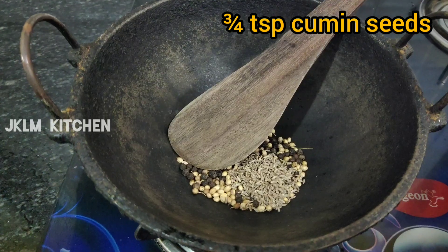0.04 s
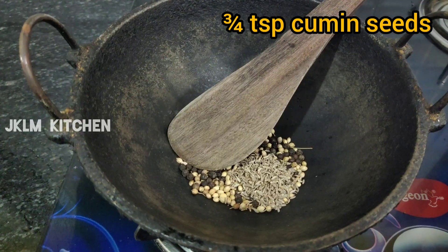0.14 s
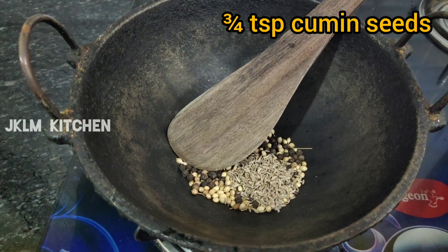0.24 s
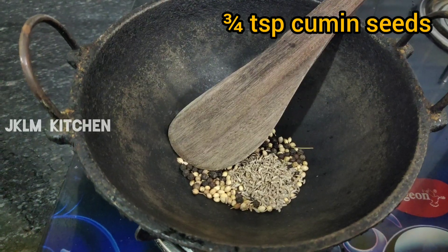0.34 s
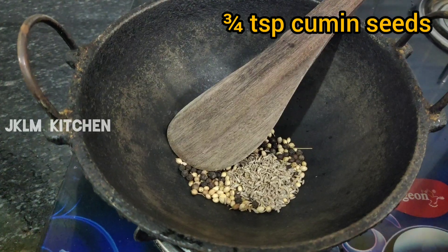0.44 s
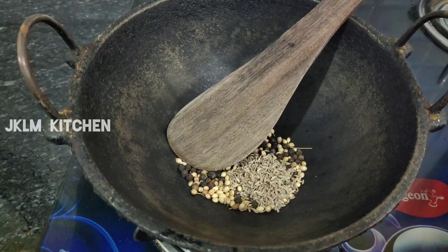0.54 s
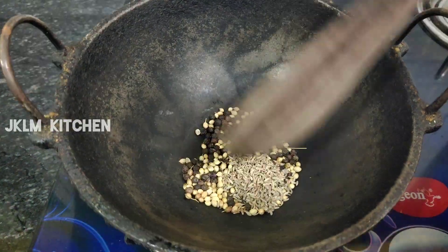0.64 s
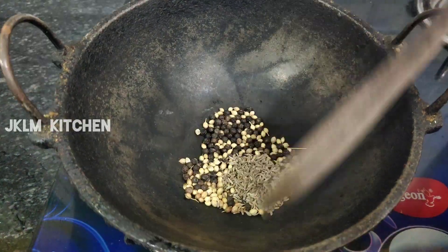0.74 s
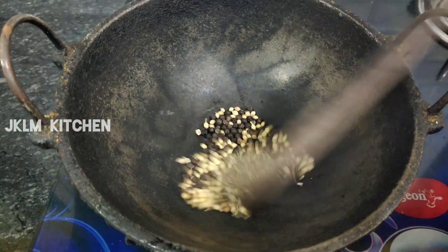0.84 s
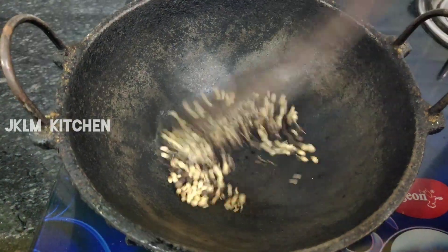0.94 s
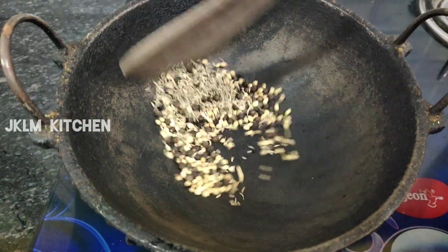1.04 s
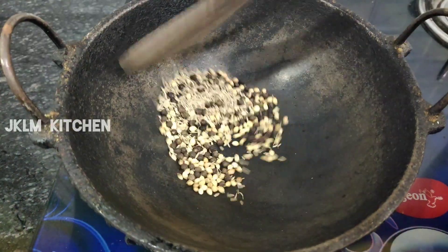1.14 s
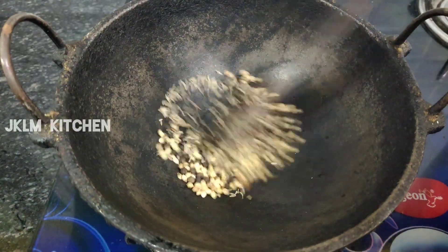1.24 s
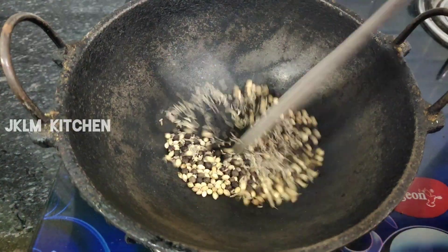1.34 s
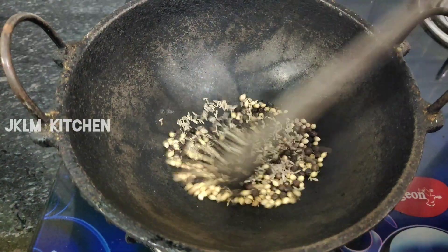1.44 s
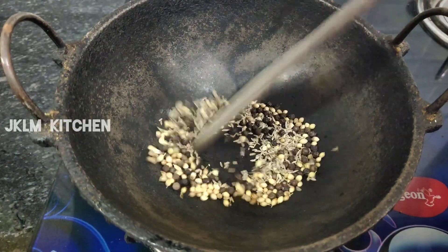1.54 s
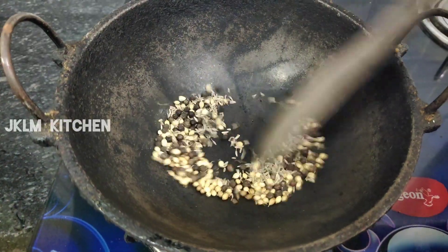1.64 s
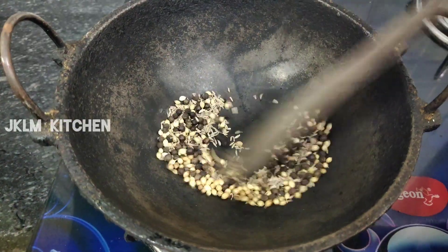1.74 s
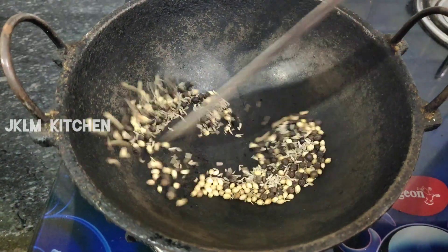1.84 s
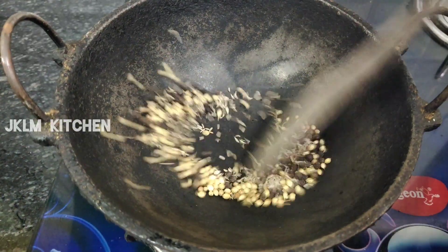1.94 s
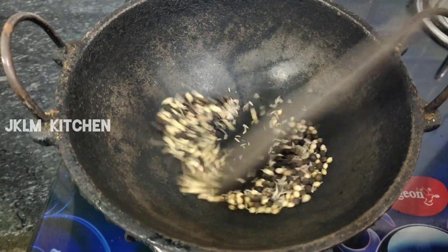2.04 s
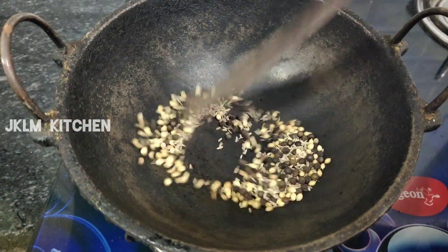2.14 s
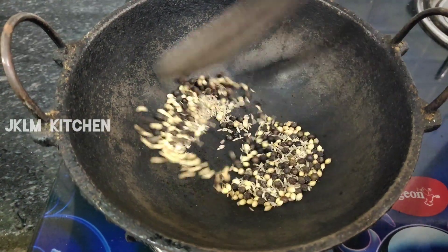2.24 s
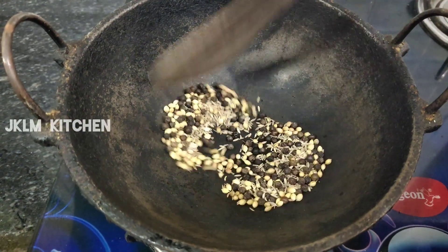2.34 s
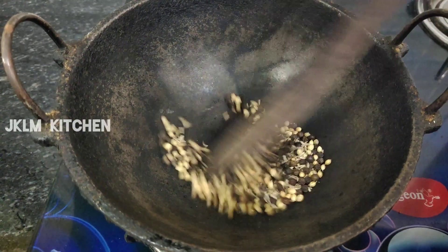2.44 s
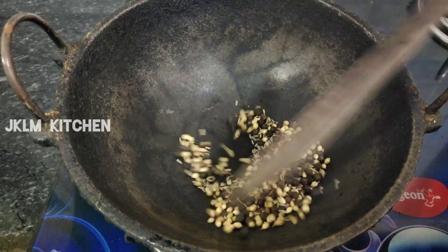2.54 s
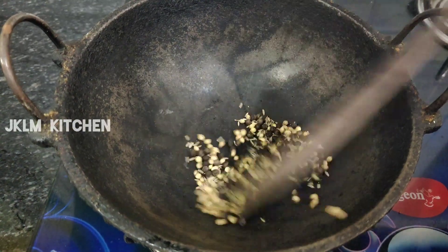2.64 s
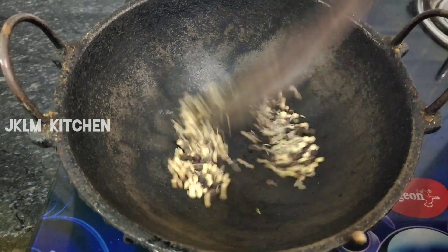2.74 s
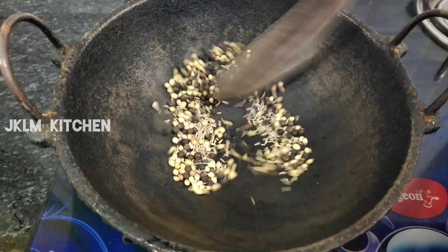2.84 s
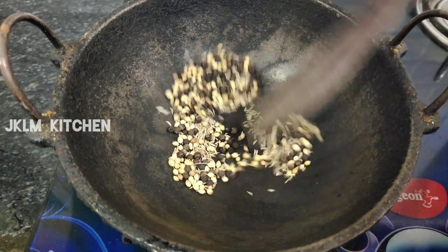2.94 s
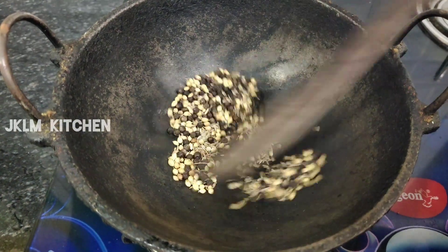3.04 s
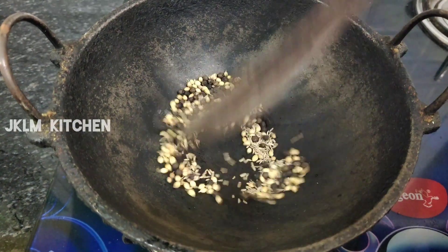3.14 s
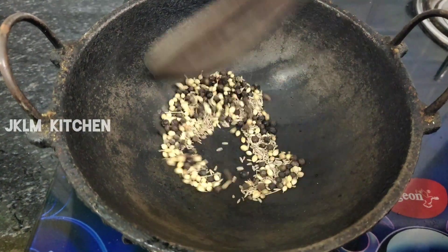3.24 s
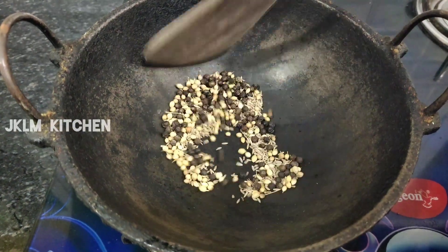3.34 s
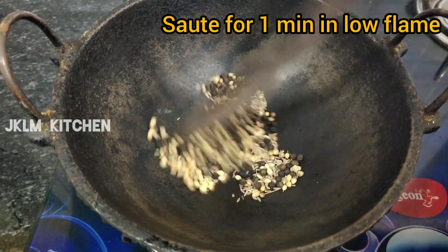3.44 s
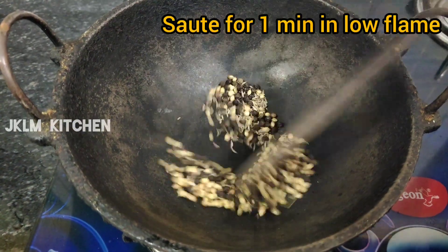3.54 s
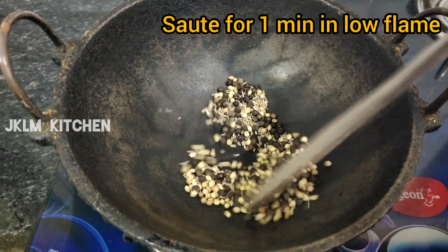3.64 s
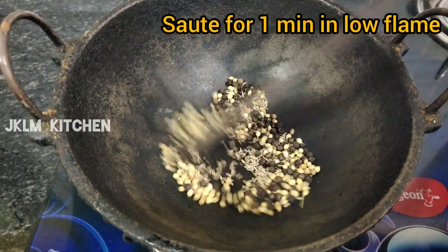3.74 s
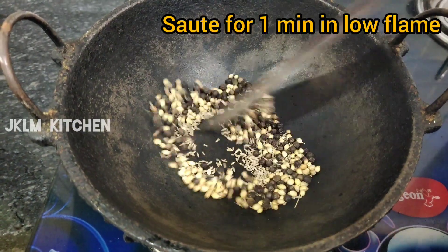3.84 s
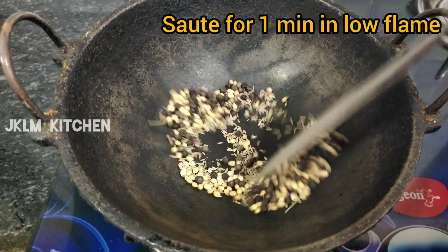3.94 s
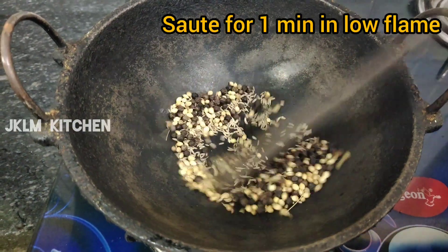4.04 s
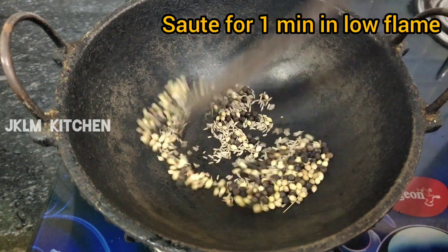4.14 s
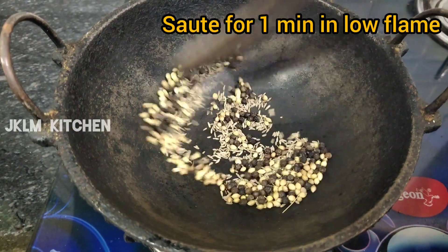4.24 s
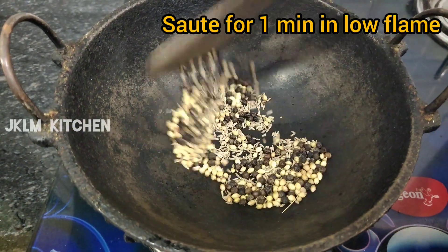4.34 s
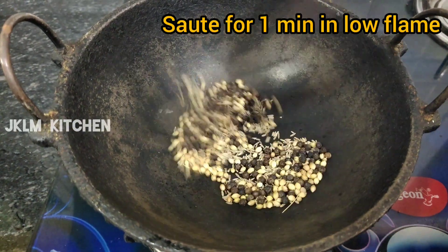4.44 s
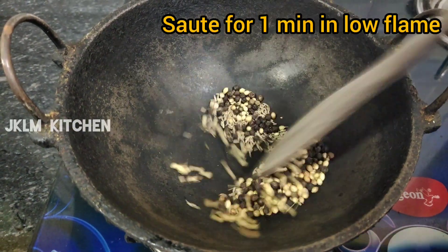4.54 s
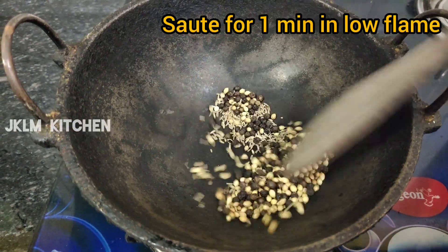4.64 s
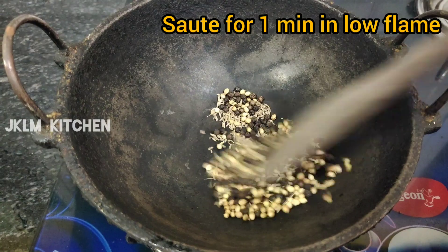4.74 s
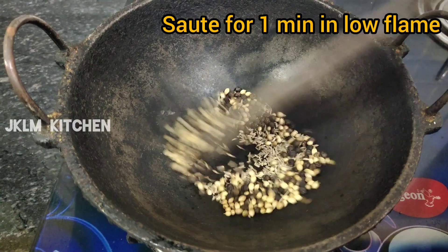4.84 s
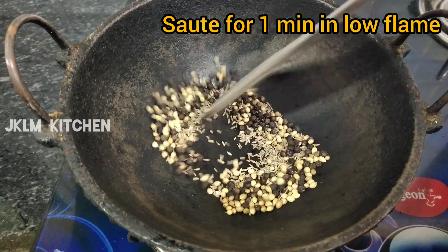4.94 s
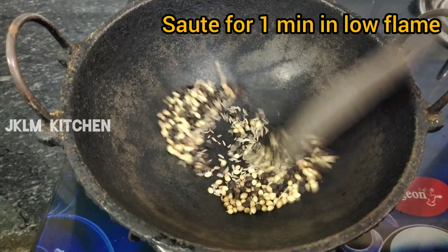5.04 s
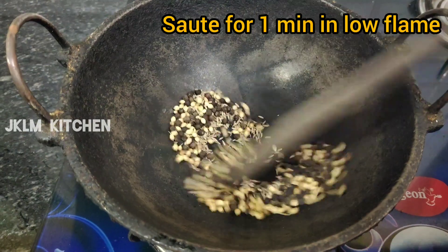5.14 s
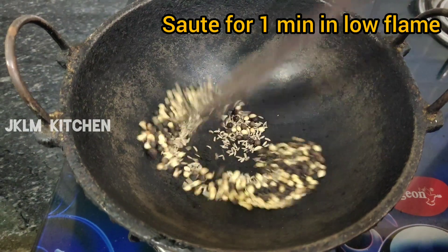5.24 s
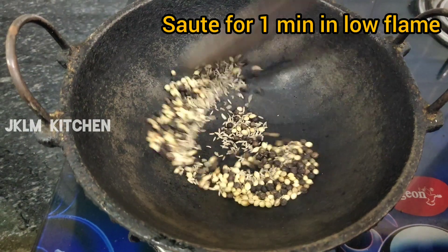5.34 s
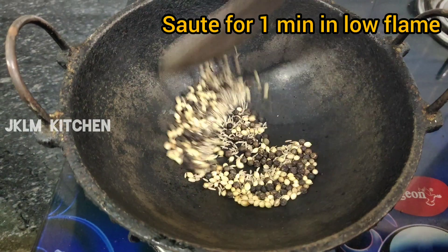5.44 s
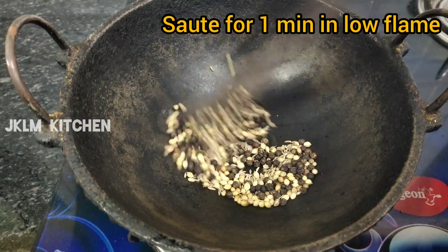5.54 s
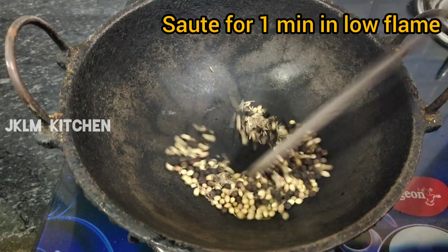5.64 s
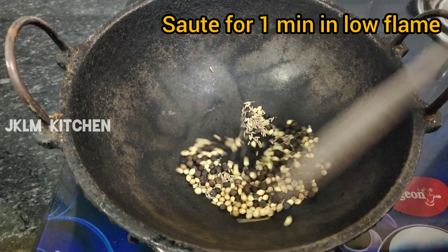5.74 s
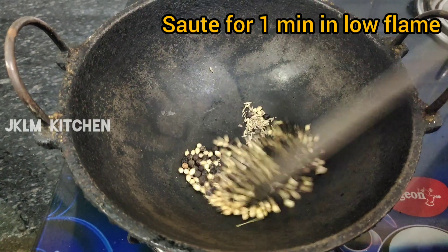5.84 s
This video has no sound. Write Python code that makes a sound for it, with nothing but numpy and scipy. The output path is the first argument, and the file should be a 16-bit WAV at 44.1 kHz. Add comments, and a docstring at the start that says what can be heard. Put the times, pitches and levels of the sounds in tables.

```python
"""Stirring seeds in an iron pan

A wooden spatula stirs lentils, peppercorns and cumin in an iron pan, close by and a little to the left.
Dense random impacts excite the resonances of bowl and iron; larger single impacts are flung seeds and blade knocks.
Stick-slip of the dragging blade shakes the pan's low modes, and single bumps shake the bowl.
Shaped noise makes a quiet kitchen with a burner whistle, heard alone first; a brief silence precedes the stirring."""
import sys
import numpy as np
from scipy import signal
from scipy.fft import rfft, irfft
from scipy.io import wavfile
from scipy.ndimage import uniform_filter1d

SR = 44100
rng = np.random.default_rng(int(sys.argv[2]) if len(sys.argv) > 2 else 0)


def file_out(sig):
    """Save sig as 16-bit WAV at sys.argv[1]."""
    # one column per channel
    cols = np.atleast_2d(sig).T
    # limit, then scale
    lim = np.clip(cols, -1, 1)
    pcm = np.round(lim * 32767).astype(np.int16)
    wavfile.write(sys.argv[1], SR, pcm)


N = 259551
MUTE_START_S, MUTE_END_S = 0.509, 0.868

# tosses of the heap: fullest_s, swell_s and settle_s (nominal time per 20 dB, steeper further down), cumin_db,
# lentil_db, pepper_db, rasp_db (each relative to cumin), left_minus_right_db
TOSSES = [(0.937, 0.062, 0.41, -43, -3.5, -6.5, -7, 6), (1.27, 0.035, 0.36, -42.5, -2, -5.5, -17.5, 7.5),
          (1.501, 0.031, 0.47, -46.5, -1.5, -7, -7.5, 8), (1.607, 0.043, 0.043, -43, -11, -12, -14, 9.5),
          (1.721, 0.16, 0.25, -44, -0.5, -1, -8.5, 7), (1.87, 0.055, 0.097, -39.5, -2.5, -8, -24, 11),
          (1.966, 0.22, 0.31, -44.5, -1.5, -5, -2.5, 8), (2.062, 0.074, 0.09, -40, -4, -2, -14, 6.5),
          (2.182, 0.22, 0.15, -43, -2.5, -8.5, -9.5, 9), (2.254, 0.17, 0.39, -47.5, -3.5, -7.5, -22, 5.5),
          (2.4, 0.0063, 0.18, -46, -3, 1, 6, 8), (2.487, 0.0055, 0.21, -35, -1, -4.5, -31, 6.5),
          (2.725, 0.023, 0.28, -43.5, 3, 5, -1.5, -2), (2.87, 0.86, 0.66, -47, -9, -17, -22, 8.5),
          (2.951, 0.026, 0.15, -50, -7, -18, -15, 11), (3.036, 0.19, 0.096, -45.5, 0.5, -6.5, -8.5, 8.5),
          (3.18, 0.076, 0.15, -44.5, 1, -13, -14, 13.5), (3.235, 0.12, 0.14, -44.5, -1, -2, -2.5, 5),
          (3.366, 0.0073, 0.069, -54, -29, -26, -32.0, 7), (3.508, 0.11, 0.19, -39, -1.5, -1, -8, 9),
          (3.701, 0.2, 0.51, -46.5, -6, -23, -26, 9), (3.765, 0.028, 0.34, -46.5, -2.5, -20, -20, 8.5),
          (3.993, 0.18, 0.4, -46, -1, -1.5, -31.5, 9), (4.232, 0.16, 0.14, -46, 1, -10, -13.5, 9.5),
          (4.283, 0.018, 0.21, -44, -13, -11, -24, 7.5), (4.412, 0.031, 0.78, -51, -27, -32, -17, 9),
          (4.534, 0.049, 0.23, -38, -1, -5.5, -14, 8), (4.773, 0.0076, 0.93, -54.5, 0.5, -1.5, -25, 7),
          (4.951, 0.27, 0.049, -48, -7, -4.5, -9.5, 10), (5.118, 0.2, 0.12, -43, -1.5, 0.5, -10, 9.5),
          (5.192, 0.13, 0.52, -49, -2.5, -6, -9, 9), (5.347, 0.14, 0.35, -47, -13, -10, -5, 7.5),
          (5.548, 0.022, 0.28, -50.5, -20, 6.5, 2, 9), (5.609, 0.015, 0.23, -38.5, -1, -6.5, -30, 9)]
# broad resonances of bowl and microphone, lower and upper set: centre_hz, width_hz, level_db
HEAVY = [(1460, 200, -8), (2150, 260, -2), (2420, 380, -6), (2650, 350, -5), (3250, 700, -7),
         (3700, 700, -9), (4050, 450, -8), (4800, 600, -6.5)]
FINE = [(5660, 540, -3), (6320, 510, -4.5), (7560, 600, 0.5), (8200, 960, -1.5), (9040, 460, 1.5),
        (10030, 960, -7), (10900, 840, -11), (12200, 3700, -19.5), (14330, 1700, -8)]
# woody resonances of the blade: centre_hz, width_hz, level_db
WOOD = [(805, 210, 3), (1094, 340, 0.5), (1475, 380, 1.5)]
# modes of the iron: mode_hz, level_db, t60_s
IRON = [(684, -13, .15), (1404, -10, .07), (1890, -5, .05), (2112, -1, .09), (2190, -4, .08),
        (2240, 0, .15), (2418, -2, .12), (2500, -5, .09), (2590, -1, .16), (2680, -5, .09), (2786, -8, .1),
        (3950, -8, .06)]
# high, quickly damped modes of the iron that small seeds ring: mode_hz, level_db, t60_s
GLINT = [(3283, -23, 0.13), (3492, -11, 0.054), (3660, -1.5, 0.042), (4760, -15, 0.021), (5030, -15, 0.026),
         (5584, -1, 0.035), (7130, -12, 0.03), (7470, -4.5, 0.036), (7800, -1, 0.035), (8440, -2, 0.035),
         (9150, 2, 0.041), (9400, -4, 0.037), (9630, -7, 0.04), (10050, -7, 0.035)]
# low modes of the pan wall, then of the bowl: centre_hz, width_hz, level_db
WALL = [(495, 35, -5), (582, 35, -1), (640, 35, -2), (684, 25, -1), (760, 90, -10)]
BOWL = [(277.5, 92, -5.5), (320.4, 46, -0.5), (425, 24, -11)]
# opening background: time_s, kitchen_db, wall_hum_db
OPENING = [(0.0, -65, -75), (0.024, -65, -66), (0.1, -64, -78), (0.168, -65.5, -65), (0.338, -65.5, -56.5),
           (0.37, -62.5, -65), (0.464, -60, -64.5), (0.496, -58, -68), (0.502, -84, -90)]


def seeds():
    """Granular impact noise: cumin hisses high, lentils rattle lower, peppercorns lowest; all stir iron modes."""
    *_, lentil_db, pepper_db, _, _ = np.transpose(TOSSES)[..., None]
    glint_db, clump_db, clumps_per_s = -10, 2.0, 45
    cumin = rattle(FINE, GLINT[5:], glint_db, count=40000)
    lentils = rattle(HEAVY[4:], GLINT[:5], glint_db, count=24000)
    pepper = rattle(HEAVY[:4], IRON, -5, count=16000)
    # the heaviest come to rest sooner; low sounds diffract, so they differ less between left and right
    heap = tossed(0, speed=0.94, sideways=0.85) * cumin
    heap = heap + tossed(lentil_db, speed=1, sideways=0.6) * lentils
    heap = heap + tossed(pepper_db, speed=1.58, sideways=0.083) * pepper
    clumps = undb(clump_db * walk(clumps_per_s))
    return light(clumps * heap)


def ticks():
    """Repeated impact: a flung seed lands and chatters for an instant, exciting the iron at each contact."""
    # single seeds: time_s, peak_db, bright_db (relative), left_minus_right_db
    landings = [(0.961, -34, 9, 11.5), (1.28, -34.5, 12, 20.5), (1.3066, -40.5, 3, 18),
                (1.312, -40.5, 11, 14), (1.4974, -51, 13, 7), (1.5977, -54, 8, 6), (1.671, -42, 5, 11),
                (1.681, -36, 10, 8), (1.7083, -37, 0, 15), (1.849, -48, 13, 6), (1.9295, -44, 16, 6),
                (1.9486, -45, 14.5, 5), (1.967, -40, 14, 8), (2.029, -46, 12, 8), (2.086, -42, 15, 11),
                (2.104, -47, 13, 6), (2.137, -43, 11, 8), (2.161, -45, 12, 8), (2.1772, -42.5, 15, 13),
                (2.338, -58, 21, 11), (2.4771, -30.5, 16, 16.5), (2.4863, -36, 11, 9), (2.494, -35, 14, 16),
                (2.501, -39, 15, 11), (2.507, -41, 12, 10), (2.519, -43, 1, 10), (2.5194, -49, 13, 6),
                (2.544, -40, 7.5, 5), (2.9475, -36.5, 10, 4), (3.0197, -40, 9, 7), (3.142, -53.5, 20.5, 10),
                (3.181, -54, 9, 8), (3.2309, -45, 17, 14.5), (3.366, -59.5, 24, 7), (3.48, -42, 19, 14),
                (3.482, -38.5, 13.5, 16), (3.496, -43, 8, 9), (3.532, -40, 13, 9), (3.56, -44, 16, 8),
                (3.691, -48, 13, 10), (3.753, -52, 20, 15), (3.771, -48, 10, 5), (3.914, -48, 12, 7),
                (3.9383, -45, 7, 11), (3.979, -38, 4, 11), (3.984, -49, 2, 5), (4.002, -43, 16.5, 9),
                (4.026, -36.5, 7.5, 12), (4.045, -38, 2, 6), (4.08, -50, -3, 5), (4.2002, -49, 16, 14),
                (4.217, -43, 2, 5), (4.233, -43, 13.5, 16), (4.242, -29.5, -18, 4),
                (4.2752, -42.5, 17.5, 6), (4.307, -47, 5, 10), (4.406, -64.5, 29, 16), (4.474, -62, 21, 10),
                (4.5117, -48.5, 26.5, 16), (4.5205, -43, 18.5, 17), (4.554, -41, -10, 15),
                (4.7752, -43, 12.5, 5.5), (4.811, -48, -11, -1), (5.026, -47, 9, 3), (5.039, -34.5, 0, 8),
                (5.107, -48, 14, 8), (5.118, -36.5, 5.5, 12), (5.6113, -30, 7, 17), (5.625, -51, 8, 7),
                (5.671, -40.5, 1.5, 21), (5.7553, -52, 15, 9)]
    s, db, bright_db, pan_db = np.transpose(landings)
    gain = panned(db, pan_db)
    low, bright = (strikes(s, size, lag_s=.00008, count=6, spread_s=.001, chatter=.55)
                   for size in (gain, gain * undb(bright_db)))
    low_part = body(low, HEAVY) / peak_of(HEAVY)
    glint = undb(-41) * ring(bright, GLINT)
    bright_part = (body(bright, FINE) + glint) / peak_of(FINE)
    return light(soft(low_part + bright_part))


def knocks():
    """Impact excitation: wood clacks on iron, then the blade skids on and keeps the iron modes ringing."""
    # blade knocks: time_s, peak_db, woody_db, bright_db, ring_db (each relative), left_minus_right_db
    blows = [(0.887, -20.5, -1, -8, -30.5, 7), (1.926, -39, 12.5, -3, -40, 0),
             (2.402, -24.5, -2, 10, -25, 6), (2.725, -19.5, -8, 6, -26.5, 8.5),
             (3.192, -43, 12.5, 1, -34, 4), (3.442, -27, 1, 1, -26.5, 5.5), (3.541, -40, 9.5, -10, -36, 2),
             (4.485, -59, 16, -8, -38, 3), (5.0056, -44.5, 11.5, -7, -11.5, 2),
             (5.332, -45, 7, 19, -34, 10), (5.547, -34.5, 8, 2, -18.5, 5)]
    # resonances of body, then bright edge: centre_hz, width_hz, level_db
    clack_peaks = [(2150, 190, 0), (2430, 200, -4), (2620, 220, -5), (2950, 300, -12)]
    edge_peaks = [(3250, 450, -6), (3680, 300, -2), (3980, 200, 0), (5650, 220, -3), (7750, 300, -3),
                  (9000, 700, -5)]
    s, db, low_db, bright_db, ring_db, pan_db = np.transpose(blows)
    gain = panned(db, pan_db)
    clack = 0
    for part_db, peaks in ((0, clack_peaks), (low_db, WOOD), (bright_db, edge_peaks)):
        contacts = strikes(s, gain * undb(part_db), lag_s=.00004, count=3, spread_s=0.00143, chatter=0.16)
        clack = clack + body(contacts, peaks) / peak_of(peaks)
    skid = strikes(s, gain * undb(ring_db), lag_s=.0001, count=200, spread_s=.065, chatter=.22)
    return soft(clack) + ring(skid, IRON)


def drag():
    """Stick-slip friction: the blade shakes the low modes; the deeper they are, the more alike at both ports."""
    # low modes under the blade: time_s, wall_ring_db, bowl_thrum_db, stove_rumble_db
    low_levels = [(0.89, -60.5, -65, -61), (0.93, -50.5, -58, -57.5), (1.11, -50.5, -60, -58.5),
                  (1.89, -55, -57.5, -54.5), (2.0, -51.5, -46, -49.5), (2.36, -55.5, -66.5, -61),
                  (2.42, -49.5, -56, -61), (2.53, -55, -58, -49), (2.7, -72, -65, -63),
                  (2.73, -81, -52, -53), (2.81, -63, -61.5, -81), (2.98, -59.5, -48.5, -66),
                  (3.1, -82, -62, -83), (3.2, -56, -58.5, -66), (3.27, -60, -60, -52),
                  (3.41, -69, -75, -82), (3.45, -53, -52, -75), (3.5, -59, -55.5, -53),
                  (3.55, -48.5, -55, -53), (3.64, -63, -58.5, -57.5), (3.89, -68.5, -67.5, -73),
                  (4.59, -63, -68, -56), (4.95, -60.5, -68, -73), (5.02, -52.5, -62, -59),
                  (5.1, -58.5, -76, -76), (5.17, -52, -71, -63), (5.3, -65, -74, -71),
                  (5.44, -63, -53, -52.5), (5.49, -69, -58.5, -54), (5.59, -45, -48.5, -66),
                  (5.65, -69, -54, -73), (5.88, -62, -78, -69)]
    # modes of the pan on its stove: centre_hz, width_hz, level_db
    stove_peaks = [(102, 14, -7), (125, 11, 0), (175, 28, -6)]
    wall_db, bowl_db, stove_db = columns(low_levels)
    wall = panned(wall_db, -2.5) * slips(WALL, apart=.6)
    bowl = panned(bowl_db, 0) * slips(BOWL, apart=.33)
    stove = panned(stove_db, 0) * slips(stove_peaks, apart=.19)
    return wall + bowl + stove


def rasp():
    """Stick-slip friction again, here exciting the woody resonances of the blade with every toss."""
    *_, rasp_db, _ = np.transpose(TOSSES)[..., None]
    return tossed(rasp_db, speed=0.99, sideways=0) * slips(WOOD, apart=1.0)


def bumps():
    """Impulse response of the bowl: dull bumps of the pan on its stand, alike at both ports."""
    # single bumps: time_s, peak_db
    thuds = [(1.938, -41), (1.9988, -32), (2.897, -44), (2.961, -47), (5.347, -51), (5.422, -41.5),
             (5.594, -56), (5.689, -55)]
    s, db = np.transpose(thuds)
    return body(strikes(s, undb([db, db]), lag_s=0), BOWL) / peak_of(BOWL)


def burner(first):
    """Noise-driven resonance: a thin whistle of the burner, with a treble hiss at first."""
    # level before stirring: time_s, whistle_db, treble_db
    flame_levels = [(0.0, -63, -90), (0.03, -68, -96), (0.12, -75, -89), (0.2, -103, -83), (0.25, -69, -83),
                    (0.28, -79, -88), (0.34, -68, -76), (0.4, -63, -79), (0.49, -62, -79),
                    (0.502, -95, -86)]
    # whistle resonances: centre_hz, width_hz, level_db
    whine_peaks = [(3320, 190, -2), (3400, 70, 2), (3670, 140, -9)]
    whine_db, treble_db = columns(flame_levels)
    whine = unit(body(rng.standard_normal((2, N)), whine_peaks, patchy_db=4.5, rate=25))
    treble = unit(body(rng.standard_normal((2, N)), HEAVY[7:] + FINE[:5], patchy_db=3, rate=25))
    later_db = -78
    return undb(np.where(first, whine_db, later_db)) * whine + first * undb(treble_db) * treble


def hush(first):
    """Diffuse-field noise: the room's spectrum, with ports more alike at low frequency."""
    # relative noise spectrum: point_hz, density_db (per Hz)
    spectrum = [(24, -65), (40, -6.5), (96, -3.5), (114, 3.5), (202, -9), (350, -9), (535, -8), (653, -24),
                (859, -22), (1190, -18.5), (1310, -18.5), (2990, -19.5), (3470, -10.5), (4130, -38),
                (9000, -32.5), (11000, -50), (15500, -44)]
    hz = np.maximum(np.fft.rfftfreq(N, 1 / SR), 1)
    points = np.array(spectrum)
    gain = undb(np.interp(np.log(hz), np.log(points[:, 0]), points[:, 1]))
    mid, side = rfft(rng.standard_normal((2, N)))
    side = side * np.clip(hz / 750, .25, 1)
    noise = unit(irfft(gain * np.array([mid + side, mid - side]), N))
    opening_db, _ = columns(OPENING)
    later_db = -68.5
    return undb(np.where(first, opening_db, later_db)) * noise * undb(1.2 * walk(30))


def kitchen():
    """Superposition of room hush and burner; at first the flame also hums in the modes of the pan wall."""
    first = np.arange(N) < MUTE_END_S * SR
    _, hum_db = columns(OPENING)
    hum = first * undb(hum_db) * slips(WALL, apart=0.6)
    return hush(first) + burner(first) + hum


def rattle(peaks, modes, ring_db, count):
    """Superposed random impacts: one kind of seed tumbling over the iron."""
    hits = swarm(count=count, scatter_db=2, lag_s=.00012)
    clatter = unit(body(hits, peaks, patchy_db=3, rate=9, mottled=True))
    ringing = unit(ring(hits, modes, patchy_db=4.5))
    return unit(clatter + undb(ring_db) * ringing)


def tossed(relative_db, speed, sideways):
    """Energy addition of incoherent sources: every toss swells, then settles, at both ports."""
    t = np.arange(0, N, 32) / SR
    s, swell, settle, db, *_, pan_db = np.transpose(TOSSES)[..., None]
    fall_db = 20 * np.where(t < s, (s - t) / swell, (t - s) * speed / settle)
    rest_db = 38  # this nominal fall is doubled
    fall_db = fall_db * (1 + fall_db / rest_db)
    power = panned(db + relative_db, sideways * pan_db) ** 2 * undb(-2 * fall_db)
    gain = np.sqrt(np.sum(power, axis=1))
    return np.array([np.interp(np.arange(N) / SR, t, port) for port in gain])


def slips(peaks, apart):
    """Stick-slip relaxation: random jolts drive resonances; apart 0 = alike at both ports."""
    side = apart * swarm(count=6000, scatter_db=0.5, lag_s=0) * np.array([[1], [-1]])
    mid = swarm(count=6000, scatter_db=2.0, lag_s=0)
    return unit(body(mid + side, peaks, patchy_db=3, rate=12))


def swarm(count, scatter_db, lag_s):
    """Shot noise: many small impacts at random moments, a few bigger than the rest."""
    moment, rank, sign = rng.random((count, 3)).T
    size_db = np.minimum(-scatter_db * np.log(1 - rank), 15)
    size = undb(size_db) * np.sign(sign - .5)
    return strikes(moment * N / SR, (size, size), lag_s)


def strikes(times, sizes, lag_s, count=1, spread_s=0.00103, chatter=0.25):
    """Impulsive contact with weaker rebounds, each reaching the right port a little earlier or later."""
    contact_s = .001
    out = np.zeros((2, N))
    chance = rng.standard_normal((len(times), count, 3))
    minor = np.arange(count) > 0
    delay = contact_s + spread_s * np.abs(chance[..., 0]) * minor
    share = np.where(minor, chatter * chance[..., 1], 1)
    for port in range(2):
        t = times[:, None] + delay + port * lag_s * chance[..., 2]
        index = np.clip((t * SR).astype(int), 0, N - 1)
        np.add.at(out[port], index, sizes[port][:, None] * share)
    return out


def body(x, peaks, patchy_db=0, rate=20, mottled=False):
    """Modal superposition, neighbours in opposite phase; patchy: each swells alone as the contact wanders.

    Mottled: each resonance is stirred with a new random strength and sign every 64 samples."""
    out = 0
    for k, (hz, width, db) in enumerate(peaks):
        push = x * undb(patchy_db * walk(rate)) if patchy_db else x
        if mottled:
            push = push * np.repeat(rng.standard_normal(N // 64 + 1), 64)[:N]
        resonance = signal.lfilter(*signal.iirpeak(hz, hz / width, fs=SR), push)
        out = out + (-1) ** k * undb(db) * resonance
    return out


def ring(x, modes, patchy_db=0, rate=8):
    """Damped modal vibration of the iron; patchy: each mode is stirred more or less as the seeds move on."""
    out = 0
    for hz, db, t60 in modes:
        pole = np.exp(2j * np.pi * hz / SR - np.log(1000) / (t60 * SR))
        push = x * undb(patchy_db * walk(rate)) if patchy_db else x
        mode = signal.lfilter([0, pole.imag], [1, -2 * pole.real, abs(pole) ** 2], push)
        out = out + undb(db) * mode
    return out


def echoes(x, wet_db, t60):
    """Exponential decay of scattered sound in the bowl and off the worktop, different at each port."""
    t = np.arange(int(t60 * SR)) / SR
    tail = rng.standard_normal((2, len(t))) * np.exp(-np.log(1000) * t / t60)
    tail = tail / np.sqrt(np.sum(tail ** 2, axis=1, keepdims=True))
    wet = signal.fftconvolve(x, tail, axes=1)[:, :N]
    return x + undb(wet_db) * wet


def soft(x):
    """Finite contact time: no blow is infinitely short, so its treble is dulled."""
    return signal.sosfilt(signal.butter(2, 10600, fs=SR, output="sos"), x)


def light(x):
    """Small impact momentum: light seeds cannot move the low modes."""
    return signal.sosfilt(signal.butter(8, 1290, "high", fs=SR, output="sos"), x)


def walk(rate):
    """Random modulation: levels drawn every 1 / rate s and joined by slopes, with spread near 1."""
    k = int(SR / rate)
    steps = np.repeat(rng.standard_normal(N // k + 1), k)
    return 1.2 * uniform_filter1d(steps, k)[:N]


def peak_of(peaks):
    """Impulse response peak of a set of resonances."""
    return np.abs(body(np.eye(1, 2048)[0], peaks)).max()


def panned(db, pan_db):
    """Interaural-style level difference: left and right gains around a mid level."""
    return undb(np.array([db + pan_db / 2, db - pan_db / 2]))


def columns(table):
    """Linear interpolation of each table column over time, one value a sample."""
    s, *rest = np.transpose(table)
    return [np.interp(np.arange(N) / SR, s, c) for c in rest]


def unit(x):
    """Root-mean-square normalisation to 1."""
    return x / np.sqrt(np.mean(x ** 2))


def undb(db):
    """Logarithmic level law: amplitude gain of a level in dB."""
    return 10 ** (np.asarray(db) / 20)


def scene():
    """Superposition of sources: stirring begins after the silent gap, over the kitchen."""
    stirring = np.arange(N) >= MUTE_END_S * SR
    heap = echoes(seeds(), wet_db=-6, t60=.06)
    blows = echoes(ticks() + knocks(), wet_db=-13, t60=.07)
    return stirring * (heap + blows + drag() + rasp() + bumps()) + kitchen()


def record(dry):
    """Gating and band limiting: a moment of silence with quick fades; bass and top are cut."""
    t = np.arange(N) / SR
    fade_s, bass_hz, top_hz = 0.0018, 60, 15600
    on = np.clip(np.maximum(MUTE_START_S - t, t - MUTE_END_S) / fade_s, 0, 1)
    thin = signal.sosfilt(signal.butter(2, bass_hz, "high", fs=SR, output="sos"), dry * on)
    return signal.sosfilt(signal.ellip(8, .2, 70, top_hz, fs=SR, output="sos"), thin)


dry = scene()
out = record(dry)
file_out(out)
```